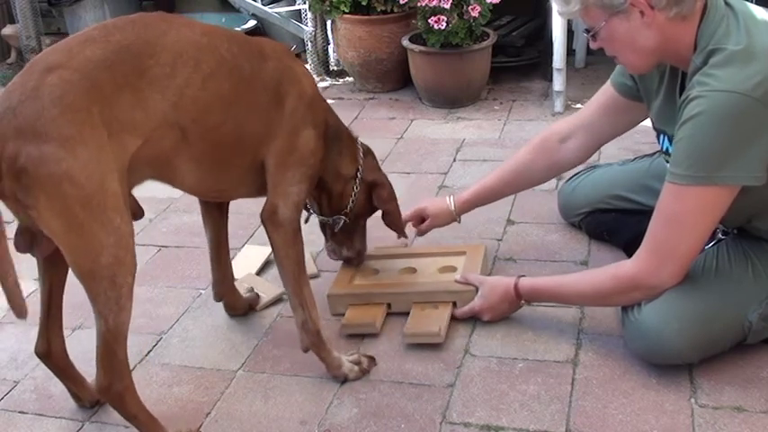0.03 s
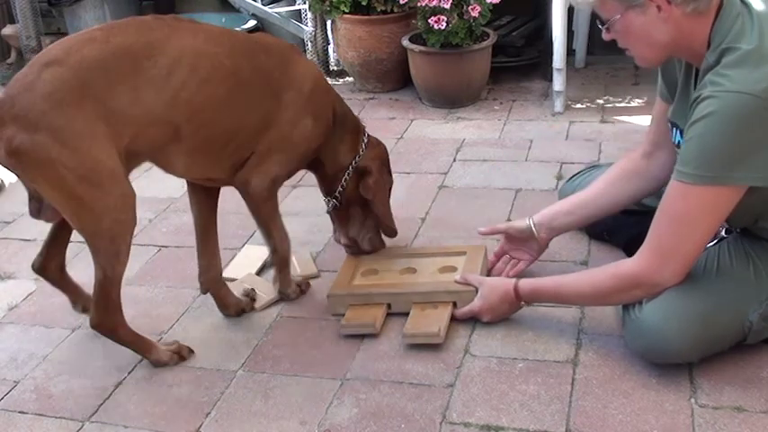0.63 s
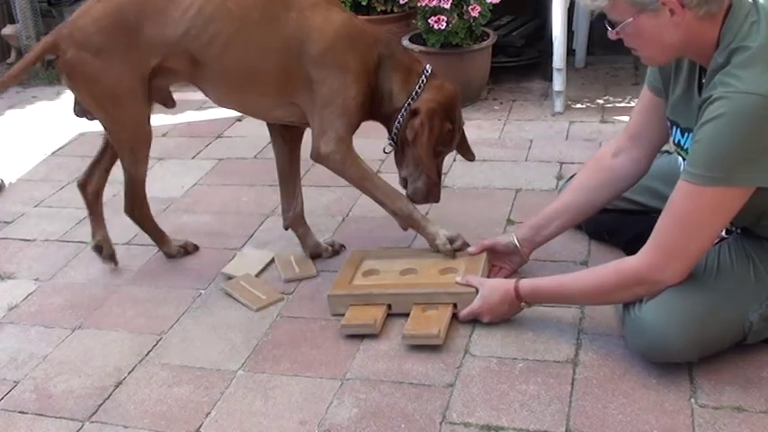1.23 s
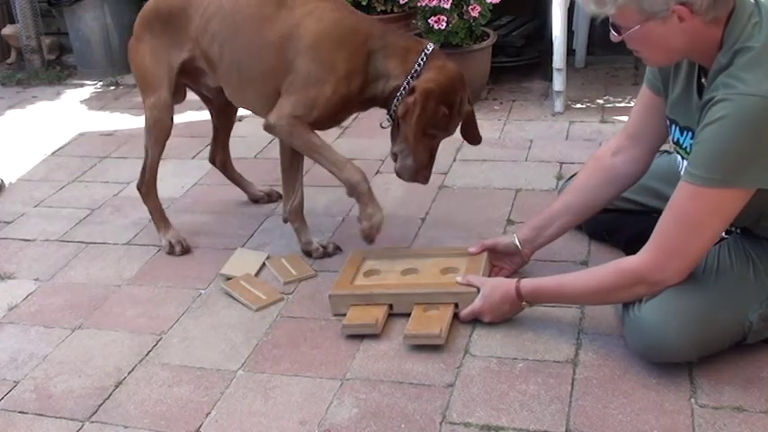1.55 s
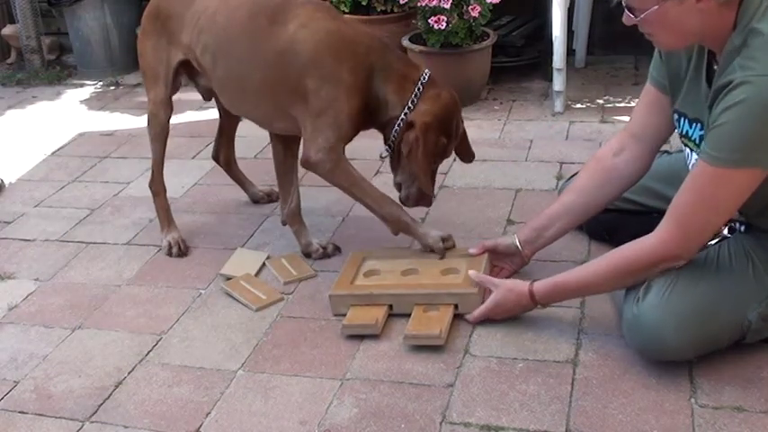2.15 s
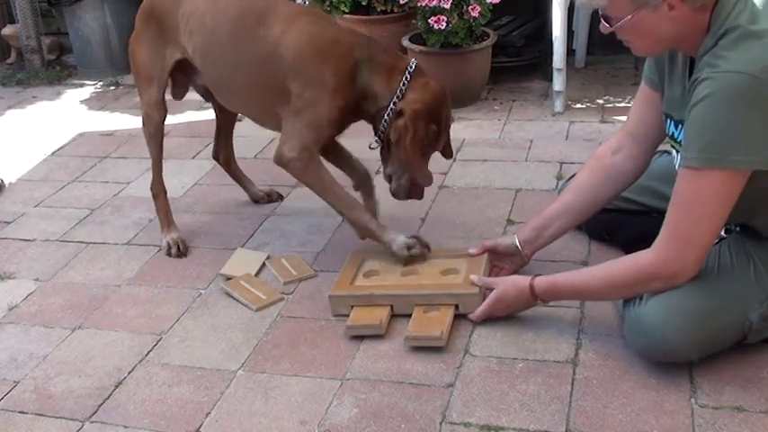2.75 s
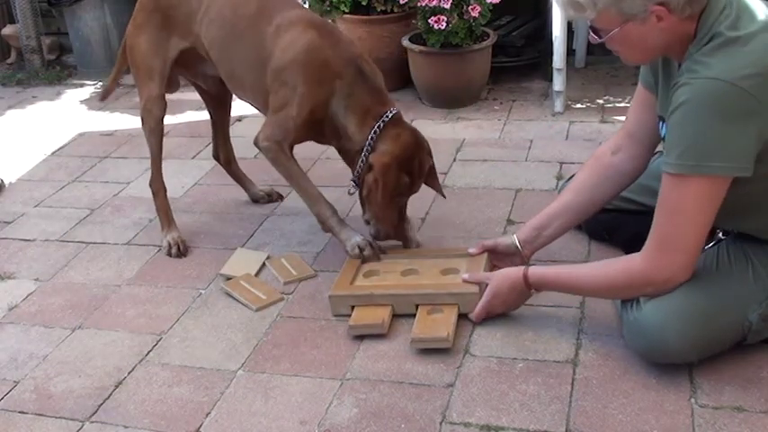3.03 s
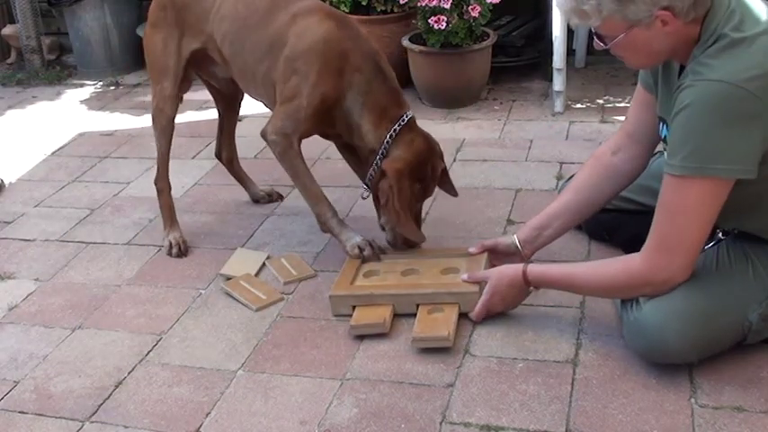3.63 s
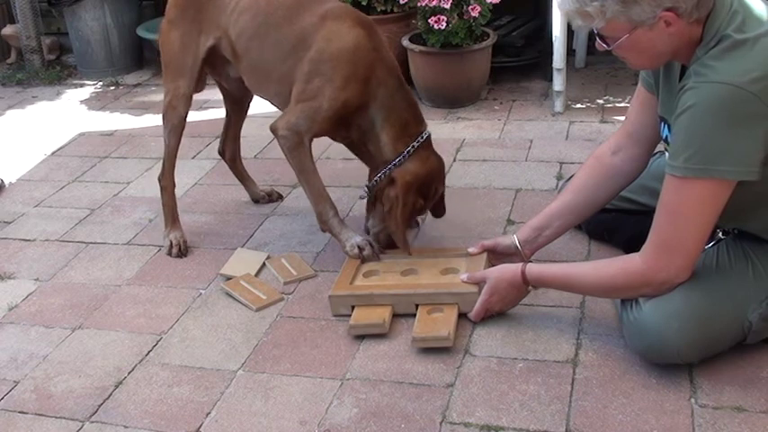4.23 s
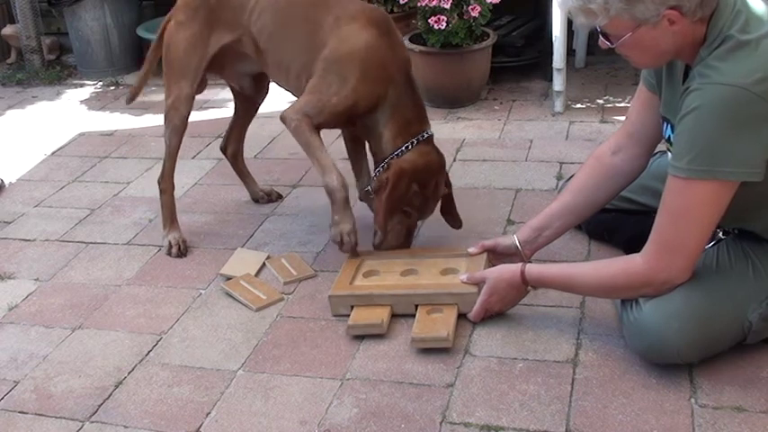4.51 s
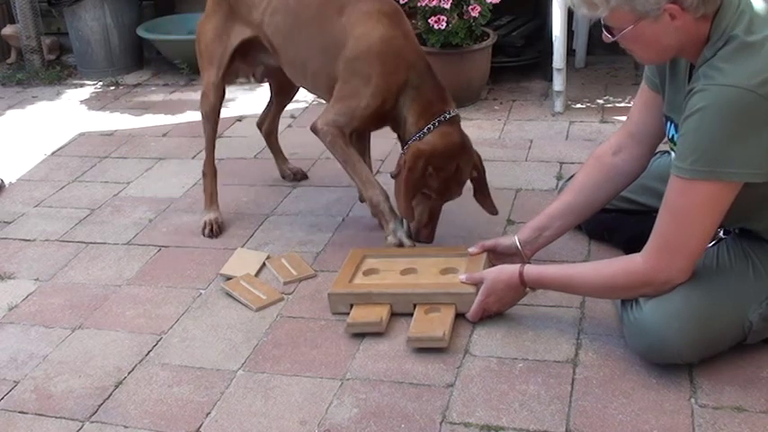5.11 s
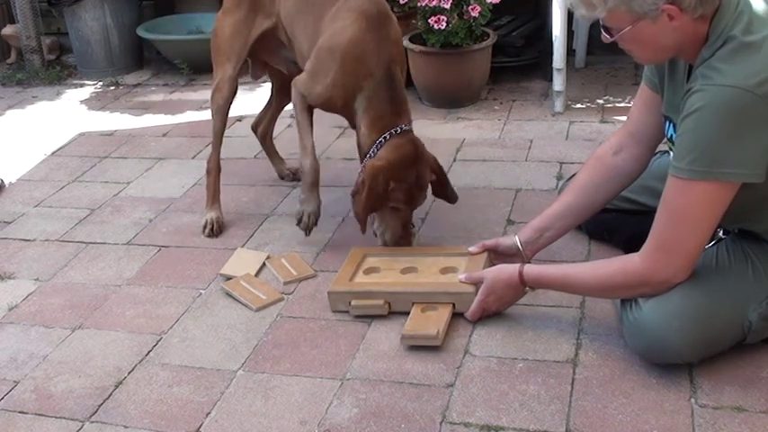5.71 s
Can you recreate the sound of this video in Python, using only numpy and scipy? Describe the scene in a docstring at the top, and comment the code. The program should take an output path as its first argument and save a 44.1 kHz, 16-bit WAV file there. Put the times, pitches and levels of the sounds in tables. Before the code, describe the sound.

A dog paws at a wooden puzzle board on a stone patio. A brief scrape and two thin, faint squeaks come first, then sharp claw clacks and short rasping strokes. Around the middle the board rocks and knocks in a quick, hollow clatter, eases off, then clatters again near the end. Collar chain ticks, gritty paw scuffs and two soft nasal grunts sit underneath. The sound is close, with a faint outdoor rumble.

```python
"""A dog's claws strike and rake a wooden puzzle board on the paving of a walled patio.
Blows and stick-slip friction drive the board's modes; it rocks and knocks on the stones.
Claws and collar chain tick, steel links ring, paws scuff grit. Two thin squeaks glide, and the dog
gives two soft nasal grunts. The walls answer briefly; a low outdoor rumble lies underneath."""
import sys
import numpy as np
from scipy import signal
from scipy.fft import rfft, irfft, next_fast_len
from scipy.io import wavfile
from scipy.ndimage import uniform_filter1d, minimum_filter1d, map_coordinates

SR = 44100
rng = np.random.default_rng(int(sys.argv[2]) if len(sys.argv) > 2 else 0)


def int16_out(signal):
    """Quantize to a 16-bit WAV file."""
    q = np.round(np.clip(np.atleast_2d(signal).T, -1, 1) * 32767)
    wavfile.write(sys.argv[1], SR, q.astype(np.int16))


N = 258867
TIME_S = np.arange(N) / SR
HIT_S = np.arange(SR // 3) / SR  # time axis of one impact

# claws and teeth on the board (time [s], level [dB], wood [dB], edge [dB], clack [Hz], followers [dB])
CLAW_HITS = [(0.8302, -11, -10, -6.5, 2220, -6.5), (1.055, -18.5, -14, -8, 3530, -17),
             (1.279, -12.5, -15, -11.5, 4000, 0), (1.389, -18.5, -13, -12, 6140, -14),
             (1.5092, -20, 0, 1.5, 1990, -14), (1.793, -8, -15.5, -14, 2350, -0.5),
             (2.1823, -22.5, -15, -14, 2010, -3), (2.2037, -13.5, -13, -11.5, 2180, -3),
             (2.2377, -15, -11, -14, 2100, -28), (2.2551, -17.5, -3.5, -33, 2140, -12),
             (2.6741, -11.5, -12.5, -11.5, 2690, 1), (2.772, -11.5, -8, -11, 2580, -4),
             (3.0137, -22, -8, -30, 2060, -13), (3.2812, -13, -35, -7.5, 3960, -14),
             (3.2965, -19, -14, -9, 3640, -10), (3.825, -16, -12, -15, 1760, -20),
             (4.033, -34.5, 6, -5.5, 2100, 3), (4.0884, -10, -4.5, -15.5, 2150, -29),
             (4.566, -34.5, -17, -7.5, 3780, -9), (5.413, -9, -44, -8.5, 4080, -22)]
# board and slider knocks (time [s], level [dB], thud [dB], hollow ring [dB], clack [dB])
KNOCK_HITS = [(1.523, -13.5, -24, -20, -10.5), (2.444, -12, -12, -3, -15.5), (2.465, -20.5, -19, -9, -9.5),
              (2.983, -11.5, -20, -15, -11), (3.008, -8.5, -13.5, -18.5, -20),
              (3.094, -23.5, -19, -11.5, -4), (3.113, -34.5, -5, 1.5, 2.5), (3.193, -8.5, -13.5, -6.5, -11),
              (3.218, -26.5, -19, -1, 3.5), (3.298, -28.5, -15, 1.5, -20), (3.486, -35, -6, -1.5, -7.5),
              (3.614, -23.5, -36, -16, -17), (3.746, -11.5, -16, -11, -21), (3.819, -30.5, -4, -4, 0),
              (3.873, -25, -24, -10, -8), (4.035, -34.5, -5.5, 6, -10), (4.156, -22, -18, -11, -20),
              (4.242, -32, -12.5, -5.5, -9.5), (5.041, -14.5, -40, -22.5, -15.5),
              (5.122, -19, -39, -15.5, -17.5), (5.26, -9, -23.5, -15, -13), (5.33, -16.5, -26, -11, -9),
              (5.345, -9.5, -17.5, -8, -27), (5.424, -29.5, 0, 3, -37), (5.509, -16, -19.5, -14.5, -8.5)]
# claw strokes (start [s], length [s], rasp [dB], hiss [dB], swell [dB], groan re rasp [dB])
RAKE_STROKES = [(0.0, 0.081, -29.5, -29, -11, -8), (0.829, 0.083, -31, -34, -13, -3.5),
                (1.298, 0.058, -31.5, -27.5, -5, -22), (1.377, 0.019, -48, -21.5, -2, -17),
                (1.479, 0.053, -30.5, -34.5, -4.5, -19), (1.578, 0.033, -24, -24, 6.5, -27),
                (1.816, 0.011, -24, -34, -3, -24), (1.837, 0.079, -28.5, -39, -1, -20),
                (1.929, 0.044, -29, -27.5, -1, 10), (2.01, 0.046, -20.5, -21.5, -11.5, -22),
                (2.353, 0.08, -32, -33, 3.5, -3.5), (2.699, 0.027, -23.5, -32.5, -10, -30),
                (2.796, 0.043, -28.5, -34, -5, -18), (2.862, 0.154, -22, -27, 0.5, -14),
                (3.165, 0.024, -49, -17, 4, -20), (3.614, 0.022, -43.5, -39.5, -10, -6),
                (3.729, 0.036, -34.5, -32, -9, -5), (3.814, 0.053, -36.5, -39.5, -14, 7.5),
                (4.625, 0.018, -38.5, -32, 8, -18), (5.235, 0.084, -32.5, -41, -2, -12),
                (5.36, 0.054, -30, -25.5, 5, 2), (5.433, 0.085, -34.5, -43, -5, -11)]
# claw and chain ticks (time [s], level [dB])
TICK_HITS = [(0.298, -26), (0.5753, -28), (0.586, -24.5), (0.627, -31.5), (0.6782, -30), (0.7673, -13.5),
             (0.776, -14.5), (1.03, -16.5), (2.0537, -12.5), (2.4274, -28), (2.4629, -14.5), (3.168, -3),
             (3.705, -26), (3.716, -17), (4.857, -28.5), (4.92, -24.5), (4.9768, -15), (5.0987, -29.5),
             (5.248, -17.5), (5.284, -15.5), (5.2993, -14), (5.5846, -22.5)]
# chain jerks (time [s], level [dB])
CHAIN_JERKS = [(2.464, -38), (3.282, -40), (3.717, -48), (4.09, -32.5), (4.243, -50), (5.299, -37)]
# paw scuffs (start [s], length [s], level [dB])
PAW_SCUFFS = [(0.276, 0.17, -44), (0.577, 0.23, -47), (0.92, 0.22, -38), (4.785, 0.087, -40.5),
              (4.892, .022, -26.5), (5.017, 0.47, -44), (5.49, 0.082, -40.5), (5.654, 0.032, -34.5)]
# squeak glides (time [s], pitch [Hz], level [dB])
LONG_GLIDE = [(0.134, 2240, -39), (0.146, 2040, -31), (0.162, 1860, -36.5), (0.181, 2200, -35.5),
              (0.2, 2430, -42)]
SHORT_GLIDE = [(0.454, 2340, -33), (0.461, 2070, -29.5), (0.467, 1820, -38.5)]
# grunts (start [s], length [s], pitch [Hz], voice [dB], nose hiss [dB], swell [dB])
DOG_GRUNTS = [(0.0, .09, 352, -41.5, -45, -5), (4.368, .072, 304, -38, -40.5, 0)]
# rumble drift (time [s], level [dB])
RUMBLE_DRIFT = [(0.0, -34), (0.41, -41.5), (1.0, -43.5), (2.0, -46.5), (2.7, -51), (3.3, -45), (4.2, -37),
                (4.6, -43.5), (5.87, -46.5)]

# board and chain link modes (frequency [Hz], level [dB], t60 [s])
BOARD_MODES = [(420, 1, .12), (472, 1, .12), (615, -7, .12), (688, -4, .16), (843, 8, .19), (893, 2, .17),
               (1013, 3, .17), (1058, 3, .17), (1273, -5, .13), (1394, 0, .12), (1516, -5, .14),
               (1780, -7, .12), (2030, -6, .1), (2370, -6, .1), (2706, -3, .1), (3272, -4, .11),
               (3547, -7, .08), (5005, -7, .08), (5140, -5, .1)]
LINK_MODES = [(7100, -2, .2), (7340, 0, .2), (8650, -11, .14)]
# source spectra (frequency [Hz], gain [dB])
CLAW_EQ = [(60, -17), (250, -20.5), (550, -4), (1000, 0), (1400, 5), (1700, 0.5), (2300, 1), (3500, 3.5),
           (5000, 2), (7800, 0.5), (10000, -11.5), (13000, -23.5), (16000, -42)]
KNOCK_EQ = [(50, -16), (200, -2.5), (420, 7), (650, 4.5), (900, 3.5), (1400, 1), (2100, 2.5), (3000, -13),
            (5000, -12.5), (9000, -18), (16000, -43)]
RASP_EQ = [(100, -48), (400, -19), (700, -1), (1100, -1), (1700, 0), (2300, 3.5), (3500, -4), (4800, -1),
           (7000, -22), (16000, -53)]
HISS_EQ = [(500, -11.5), (3500, -0.5), (5200, 2), (7700, 7.5), (9000, 1), (11000, -10), (16000, -25)]
TICK_EQ = [(300, -16), (1500, -11), (3500, -7), (5500, -1), (7600, 4.5), (9000, 0), (11000, -12.5),
           (16000, -27)]
NOSE_EQ = [(100, 4), (350, -1.5), (900, -6), (2200, 2.5), (3700, -6.5), (4800, -4.5), (8000, -9),
           (12000, -27), (16000, -48)]
RUMBLE_EQ = [(30, -51), (100, -29), (160, -2.5), (222, 5), (270, -1), (335, -4), (440, -8.5), (1200, -23),
             (8000, -108)]
AIR_EQ = [(15, -7), (25, -16.5), (76, 0), (161, -9), (317, -5.5), (516, -16), (575, -10.5), (641, -21),
          (840, -17.5), (1020, -19), (1190, -20), (1890, -22), (9570, -29.5), (13600, -35.5),
          (16000, -35.5)]
# colour of a claw sliding lightly or digging in (frequency [Hz], gain [dB])
SLIDE_EQ = [(600, -5), (1000, -3), (1500, -0.5)]
DIG_EQ = [(200, 9), (420, 12), (650, 6.5), (1000, -1.5), (1400, 1.5), (2500, -12.5)]
# wall decay (frequency [Hz], t60 [s])
PATIO_DECAY = [(200, 0.2), (600, 0.26), (1500, 0.23), (4000, 0.23), (8000, 0.2), (15000, 0.11)]
# stereo width (frequency [Hz], side re mid [dB])
SIDE_EQ = [(100, -26), (280, -20), (500, -15), (1200, -15), (2500, -11), (5000, -8), (8500, -7),
           (13000, -14)]


def amp(db):
    """Decibels to gain."""
    return 10 ** (np.asarray(db) / 20)


def unit(x):
    """x at rms 1."""
    return x / np.sqrt(np.mean(x ** 2) + 1e-20)


def along(points, hz):
    """Interpolate (frequency [Hz], value) points on a log axis."""
    knots_hz, values = np.transpose(points)
    return np.interp(np.log(hz + 1), np.log(knots_hz + 1), values)


def curves(rows):
    """One value per sample for each column after the time."""
    times_s, *columns = np.transpose(rows)
    return [np.interp(TIME_S, times_s, column) for column in columns]


def wobble(rate_hz):
    """Smooth random curve with knots at rate_hz."""
    return map_coordinates(rng.standard_normal(int(N * rate_hz / SR) + 4), [TIME_S * rate_hz])


def coloured(x, *spectra):
    """Minimum-phase filter; the spectra add in dB."""
    n = x.shape[-1]
    size = 2 * next_fast_len(n // 2 + 2048)
    hz = np.fft.rfftfreq(size, 1 / SR)
    gain_db = sum(along(spectrum, hz) for spectrum in spectra)
    cepstrum = irfft(np.log(amp(gain_db)))
    cepstrum[1:size // 2] *= 2
    cepstrum[size // 2 + 1:] = 0
    return irfft(rfft(x, size) * np.exp(rfft(cepstrum)), size)[..., :n]


def add(track, time_s, sound):
    """Mix a stereo sound in at time_s."""
    part = track[:, max(round(time_s * SR), 0):][:, :sound.shape[1]]
    part += sound[:, :part.shape[1]]


def claws():
    """A paw's claws land on the wood in quick succession; each blow has its own clack pitch."""
    out = np.zeros((2, N))
    for time_s, level_db, wood_db, edge_db, clack_hz, follow_db in CLAW_HITS:
        force = contacts(follow_db, spread_s=0.0096, smear_s=0.00179, count=10)
        clack_eq = [(clack_hz / 1.25, -1), (clack_hz, 5), (clack_hz * 1.21, -1)]
        blow_eq = [(1000, wood_db), (2200, -8.5), (4000, -10.5), (6500, edge_db)]
        blow = coloured(board(force), CLAW_EQ, clack_eq, blow_eq)
        add(out, time_s, amp(level_db + 29.5) * patio(blow, wet_db=2))
    return out


def contacts(follow_db, spread_s, smear_s, count):
    """One impulse plus followers at mean delay spread_s; each frequency lags by up to smear_s."""
    force = np.zeros(len(HIT_S))
    delays_s = np.minimum(spread_s * rng.exponential(size=count), HIT_S[-1])
    sizes = rng.standard_normal(count)
    np.add.at(force, (delays_s * SR).astype(int), amp(follow_db) * sizes / np.linalg.norm(sizes))
    force[0] += 1
    hz = np.fft.rfftfreq(len(HIT_S), 1 / SR)
    knots_hz = np.linspace(0, SR / 2, 28)
    lag_s = smear_s * np.interp(hz, knots_hz, rng.random(len(knots_hz)))
    allpass = np.exp(-2j * np.pi * np.cumsum(lag_s) * hz[1])
    return irfft(rfft(force) * allpass, len(HIT_S)) * (1 - HIT_S / HIT_S[-1])


def board(force, vary_db=3):
    """Direct force plus damped wood modes; each contact point weights the modes anew."""
    hz, level_db, t60_s = np.transpose(BOARD_MODES)[:, :, None]
    decay_per_s = np.log(1000) / t60_s
    weights = amp(level_db + vary_db * rng.standard_normal(level_db.shape)) * 2 * decay_per_s / SR
    response = np.sum(weights * np.exp(-decay_per_s * HIT_S) * np.cos(2 * np.pi * hz * HIT_S), axis=0)
    response[0] += 1
    return signal.fftconvolve(force, response)[:len(force)]


def knocks():
    """The board tips onto the stones or a slider meets its stop: a blunt blow with quick chatter."""
    out = np.zeros((2, N))
    for time_s, level_db, thud_db, hollow_db, clack_db in KNOCK_HITS:
        force = contacts(follow_db=-8, spread_s=0.003, smear_s=0.0012, count=3)
        blow_eq = [(480, thud_db), (750, hollow_db), (1050, hollow_db), (1400, -7.5), (2100, clack_db)]
        blow = coloured(board(force, vary_db=4), KNOCK_EQ, blow_eq)
        add(out, time_s, amp(level_db + 34.5) * patio(blow, wet_db=1.5))
    return out


def raking():
    """Dragged claws rasp through the board's modes, deeper as they dig in; their tips hiss and snag."""
    dig_s = 0.059  # last part of a stroke
    rasp_gain, hiss_gain, groan_gain = np.zeros((3, N))
    for start_s, length_s, rasp_db, hiss_db, swell_db, groan_db in RAKE_STROKES:
        pressure = gesture(start_s, length_s, swell_db, attack_s=0.033, release_s=0.017)
        digging = np.clip(1 - (start_s + length_s - TIME_S) / dig_s, 0, 1)
        rasp_gain += amp(rasp_db) * pressure
        hiss_gain += amp(hiss_db) * pressure
        groan_gain += amp(rasp_db + groan_db) * pressure * digging
    fine_slips = unit(slips(rate_hz=5000, scatter_db=1.5))
    coarse_slips = unit(slips(rate_hz=220, scatter_db=1))
    wood = board(fine_slips + amp(-7) * coarse_slips)
    rasp = rasp_gain * moving_contact(coloured(wood, RASP_EQ, SLIDE_EQ), depth_db=2.8)
    groan = groan_gain * moving_contact(coloured(wood, RASP_EQ, DIG_EQ), depth_db=2.4)
    tip_slips = slips(rate_hz=6000, scatter_db=1.5)
    hiss = hiss_gain * moving_contact(coloured(tip_slips, HISS_EQ), depth_db=2.4)
    grip = unit(amp(2.5 * wobble(130)))  # claws catch and let go
    snags = unit(amp(2.5 * wobble(350)))
    scrape = grip * (amp(-4) * rasp + amp(-3.5) * groan + amp(-6) * snags * hiss)
    return patio(scrape, wet_db=-3)


def gesture(start_s, length_s, swell_db, attack_s, release_s):
    """Gain of one movement: changes by swell_db over its length, with ramps outside that span."""
    age_s = TIME_S - start_s
    gate = np.clip(1 + np.minimum(age_s / attack_s, (length_s - age_s) / release_s), 0, 1) ** 2
    progress = np.clip(age_s / length_s, 0, 1)
    return gate * amp(swell_db * (progress - 0.5))


def slips(rate_hz, scatter_db):
    """Stick-slip friction: random impulses of uneven size."""
    slipping = rng.random(N) < rate_hz / SR
    return slipping * rng.standard_normal(N) * amp(scatter_db * rng.standard_normal(N))


def moving_contact(x, depth_db):
    """A moving contact point favours changing resonances."""
    spectrogram = signal.stft(x, nperseg=256)[2]
    field = uniform_filter1d(rng.standard_normal(spectrogram.shape), size=6, axis=0)
    field = unit(uniform_filter1d(field, size=5, axis=1))
    return unit(signal.istft(spectrogram * amp(depth_db * field), nperseg=256)[1][:N])


def ticks():
    """Claws and chain make small hard contacts with no wood behind them."""
    out = np.zeros((2, N))
    for time_s, level_db in TICK_HITS:
        force = contacts(follow_db=-8, spread_s=0.0008, smear_s=0.0013, count=5)
        add(out, time_s, amp(level_db + 16.5) * patio(coloured(force, TICK_EQ), wet_db=-3))
    return out


def chain():
    """A jerk of the neck leaves a few steel links ringing."""
    out = np.zeros(N + len(HIT_S))
    for time_s, level_db in CHAIN_JERKS:
        for hz, mode_db, t60_s in LINK_MODES:
            detuned_hz = hz * rng.normal(1, 0.004)
            envelope = amp(level_db + mode_db - 60 * HIT_S / t60_s)
            out[round(time_s * SR):][:len(HIT_S)] += envelope * np.sin(2 * np.pi * detuned_hz * HIT_S)
    chatter = amp(2 * wobble(350))
    return patio(out[:N] * chatter, wet_db=-9)


def scuffs():
    """Paws slip on gritty stone, fading as they come to rest."""
    gain = np.zeros(N)
    for start_s, length_s, level_db in PAW_SCUFFS:
        gain += amp(level_db) * gesture(start_s, length_s, swell_db=-1.5, attack_s=0.018, release_s=0.018)
    friction = slips(rate_hz=1200, scatter_db=2.5)
    grit = unit(coloured(friction, HISS_EQ) * amp(2 * wobble(30)))
    return patio(amp(-9) * gain * grit, wet_db=-4)


def squeaks():
    """Two thin, rough, gliding tones with weak overtones."""
    fade_s = 0.002
    out = np.zeros(N)
    for glide in (LONG_GLIDE, SHORT_GLIDE):
        pitch_hz, level_db = curves(glide)
        start_s, end_s = glide[0][0], glide[-1][0]
        gate = np.clip(1 + np.minimum(TIME_S - start_s, end_s - TIME_S) / fade_s, 0, 1)
        phase = 2 * np.pi * np.cumsum(pitch_hz * (1 + 0.06 * wobble(1500))) / SR
        tone = sum(amp(db) * np.sin(k * phase) for k, db in enumerate((0, -14, -23, -23), start=1))
        out += amp(level_db) * gate * unit(tone * amp(3 * wobble(600)))
    return patio(out, wet_db=-2)


def grunts():
    """Rough nasal grunts, muzzle in the board; pitch rises and falls with effort."""
    pitch_sag = 0.12
    out = np.zeros(N)
    for start_s, length_s, hz, voice_db, hiss_db, swell_db in DOG_GRUNTS:
        effort = gesture(start_s, length_s, swell_db, attack_s=0.025, release_s=0.04)
        pitch_hz = hz * (1 - pitch_sag * (1 - np.minimum(effort, 1)))
        phase = 2 * np.pi * np.cumsum(pitch_hz * (1 + 0.055 * wobble(150))) / SR
        tone = np.sin(phase) + amp(-10) * np.sin(2 * phase)
        voice = unit(tone * amp(3 * wobble(90)))
        hiss = unit(coloured(rng.standard_normal(N), NOSE_EQ))
        out += effort * (amp(voice_db) * voice + amp(hiss_db) * hiss)
    return patio(out, wet_db=-4)


def patio(x, wet_db, build_s=0.00033):
    """Centred direct sound plus wall reflections, wider in the treble."""
    hz, age_s, noise = signal.stft(rng.standard_normal((2, len(HIT_S))), SR, nperseg=256)
    decaying = noise * amp(-60 * age_s / along(PATIO_DECAY, hz)[:, None])
    decaying[1] *= amp(along(SIDE_EQ, hz))[:, None]
    tail = signal.istft(decaying, SR, nperseg=256)[1][:, :len(HIT_S)]
    tail *= 1 - np.exp(-HIT_S / build_s)
    mid, side = amp(wet_db) * tail / np.linalg.norm(tail[0])
    mid[0] += 1  # direct path
    response = np.array([mid + side, mid - side]) / np.linalg.norm(mid)
    return signal.fftconvolve(x[None], response, axes=1)[:, :len(x)]


def background():
    """Slowly drifting outdoor rumble over steady air."""
    drift_db, = curves(RUMBLE_DRIFT)
    mid, side = coloured(rng.standard_normal((2, N)), AIR_EQ, [(20, -40), (45, 8)])
    side = coloured(side, SIDE_EQ, [(50, -30), (150, 3.5)])  # deep bass nearly mono
    air = amp(-47) * unit(np.array([mid + side, mid - side]))
    rumble = unit(coloured(rng.standard_normal(N), RUMBLE_EQ) * amp(1.2 * wobble(9)))
    return air + amp(drift_db - 6.5) * rumble


def scene():
    """Stereo sum of all sources."""
    impacts = claws() + knocks() + ticks()
    return impacts + chain() + raking() + scuffs() + squeaks() + grunts() + background()


def record(dry):
    """Peak limiter with gain dips of a few milliseconds, then a brick-wall low-pass."""
    ceiling_db, cutoff_hz, window_samples = -6.5, 16300, 130
    needed_gain = np.minimum(1, amp(ceiling_db) / (np.abs(dry).max(axis=0) + 1e-9))
    gain = uniform_filter1d(minimum_filter1d(needed_gain, window_samples), window_samples)
    size = next_fast_len(N + SR // 2)
    passband = np.fft.rfftfreq(size, 1 / SR) < cutoff_hz
    return irfft(rfft(dry * gain, size) * passband, size)[:, :N]


dry = scene()
out = record(dry)
int16_out(out)
```